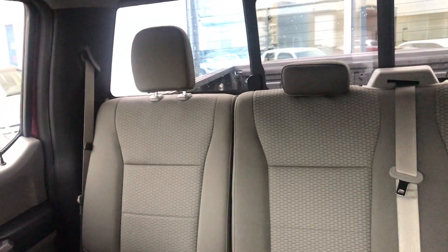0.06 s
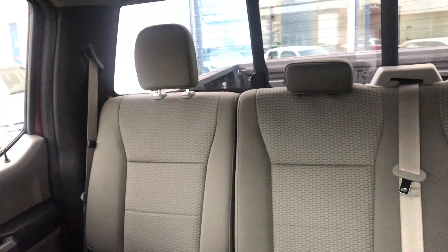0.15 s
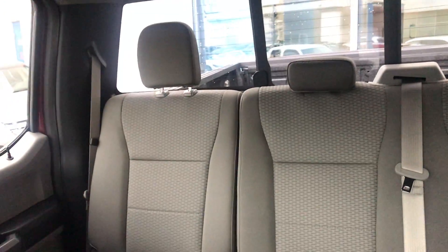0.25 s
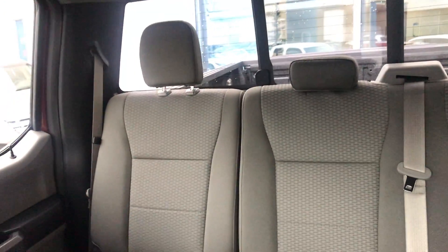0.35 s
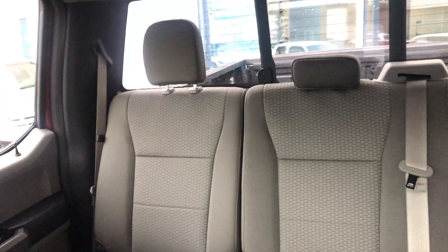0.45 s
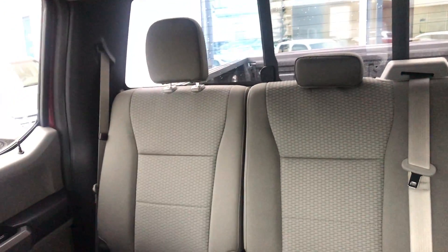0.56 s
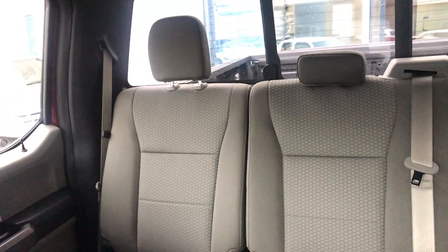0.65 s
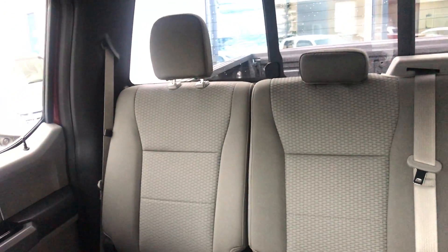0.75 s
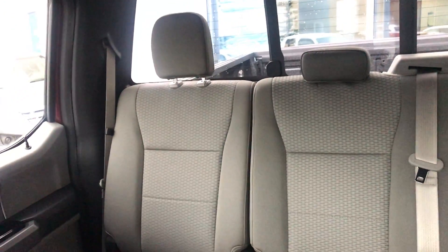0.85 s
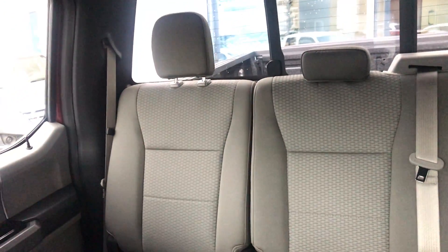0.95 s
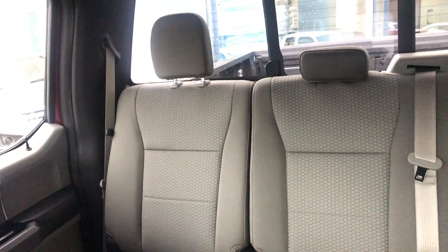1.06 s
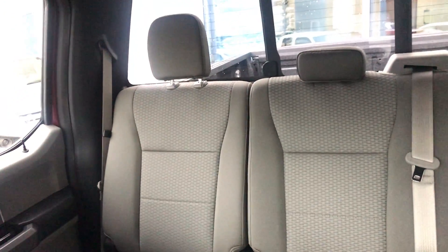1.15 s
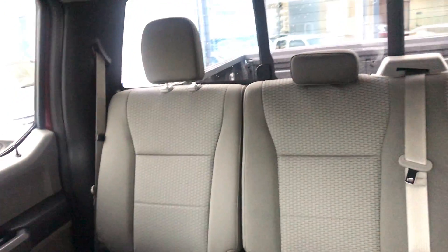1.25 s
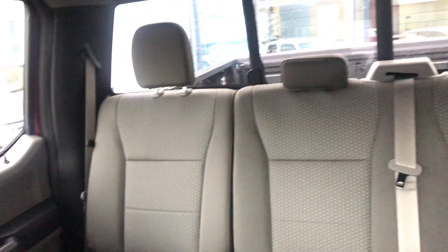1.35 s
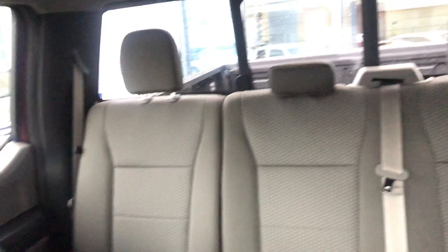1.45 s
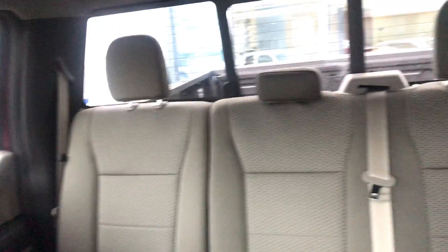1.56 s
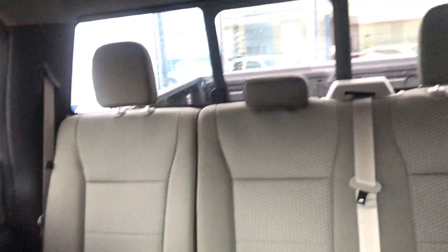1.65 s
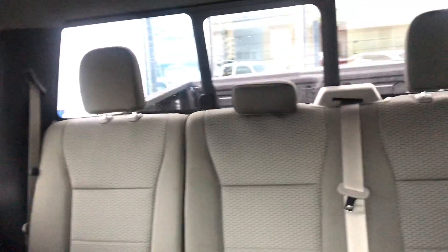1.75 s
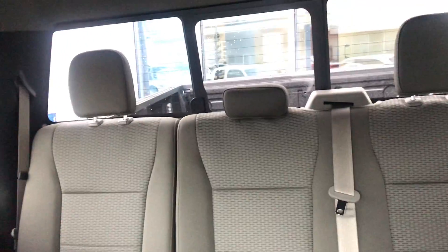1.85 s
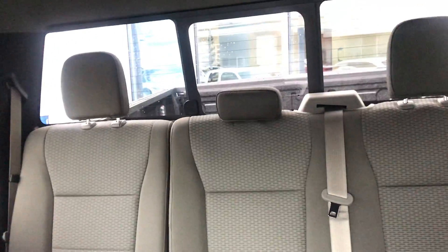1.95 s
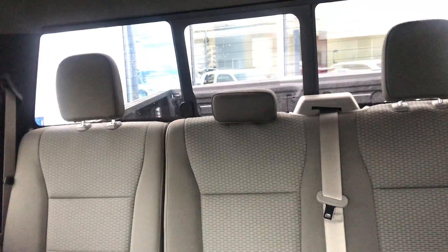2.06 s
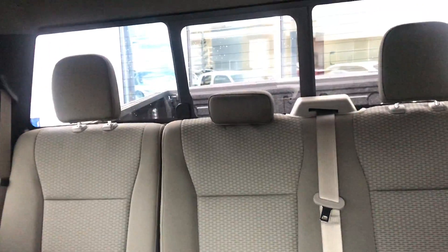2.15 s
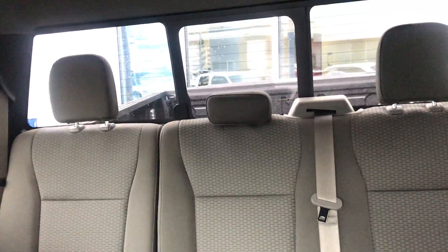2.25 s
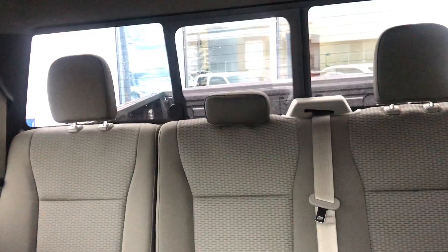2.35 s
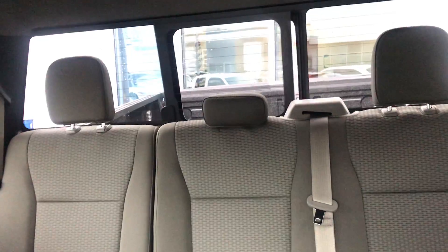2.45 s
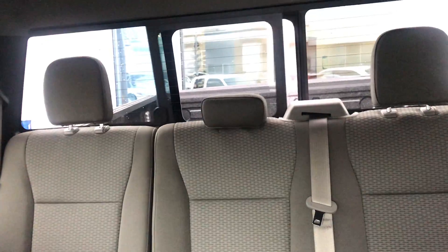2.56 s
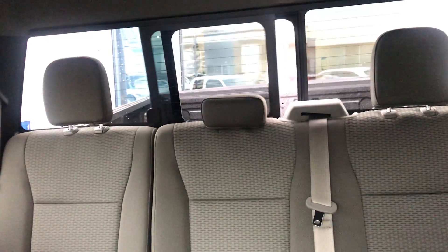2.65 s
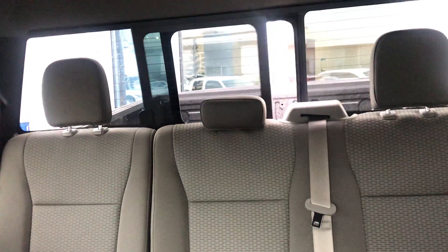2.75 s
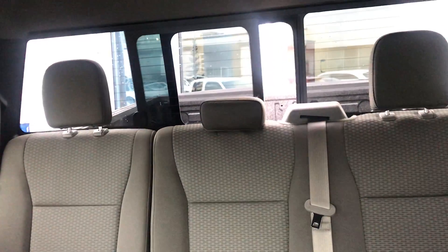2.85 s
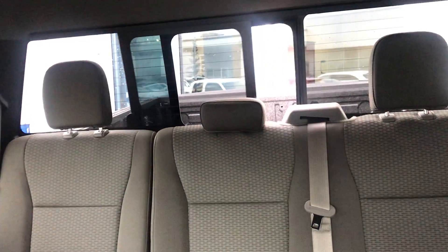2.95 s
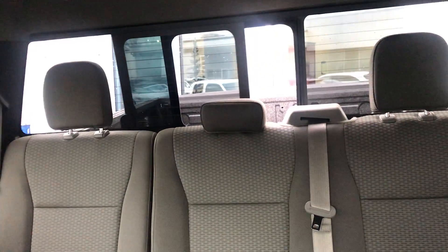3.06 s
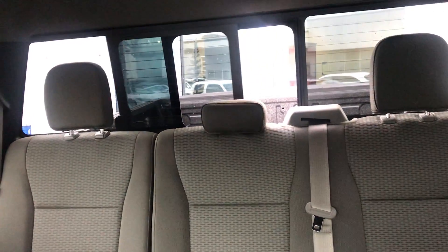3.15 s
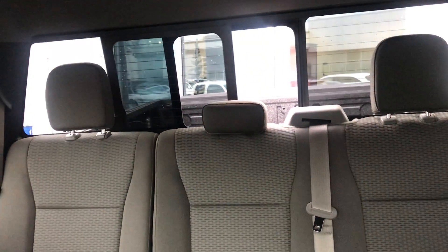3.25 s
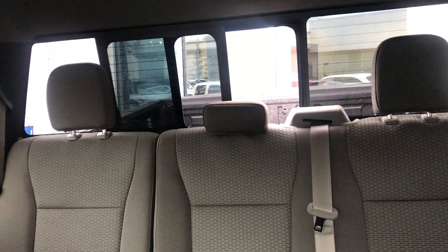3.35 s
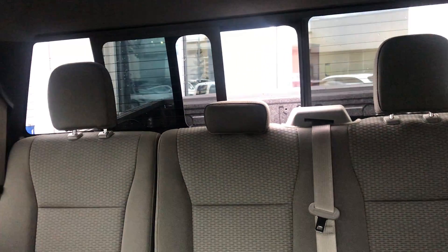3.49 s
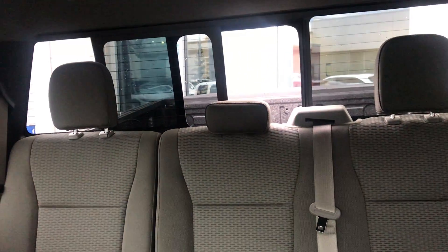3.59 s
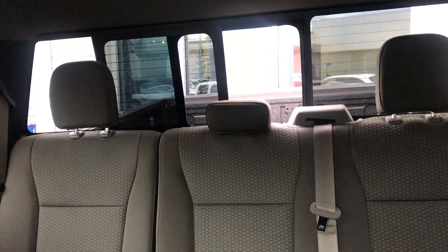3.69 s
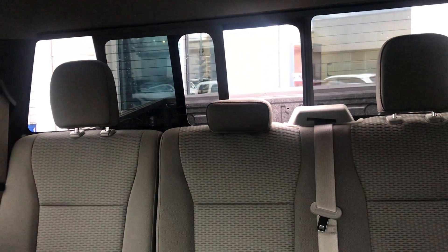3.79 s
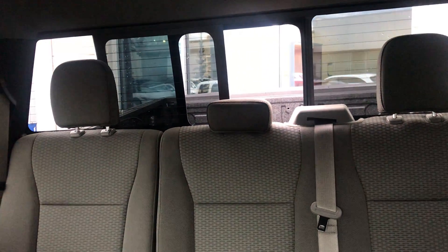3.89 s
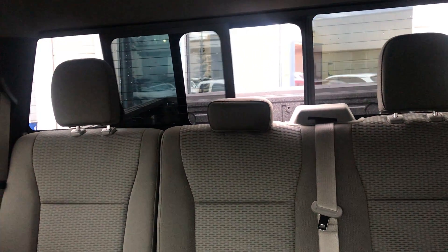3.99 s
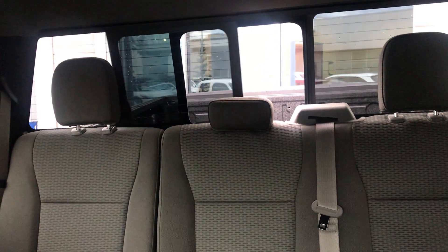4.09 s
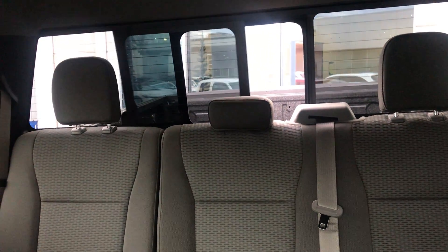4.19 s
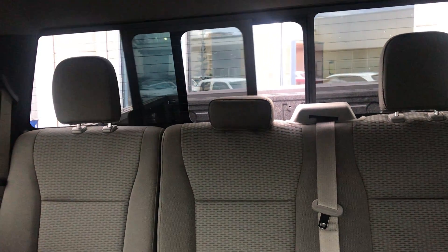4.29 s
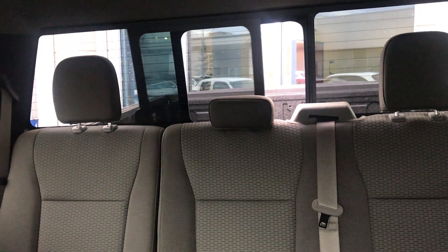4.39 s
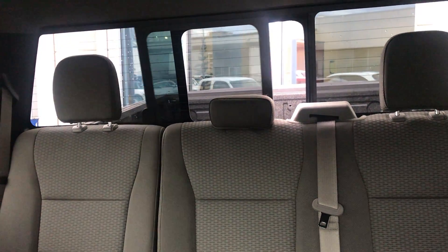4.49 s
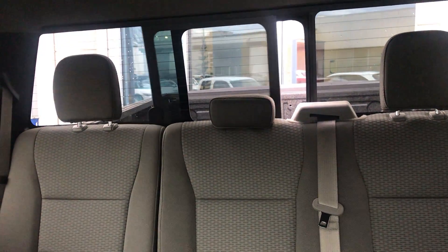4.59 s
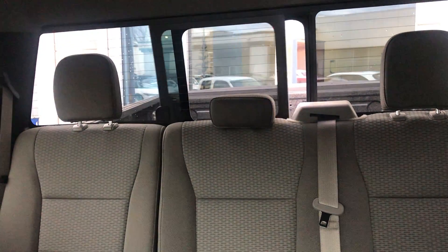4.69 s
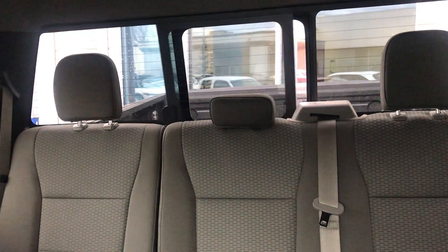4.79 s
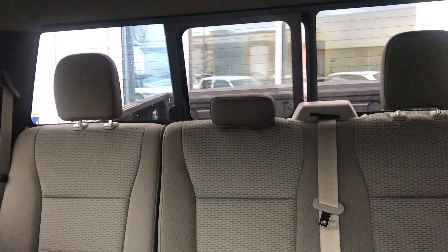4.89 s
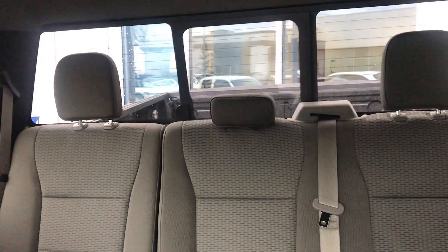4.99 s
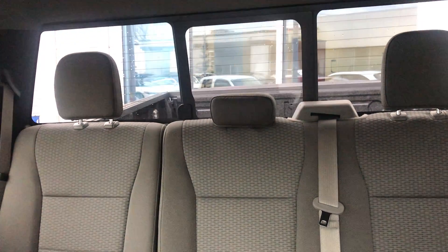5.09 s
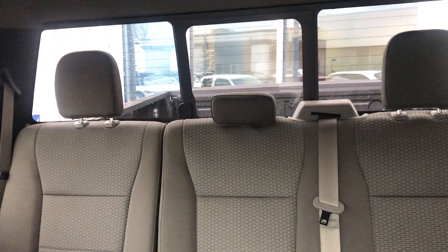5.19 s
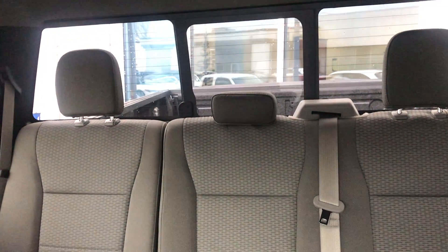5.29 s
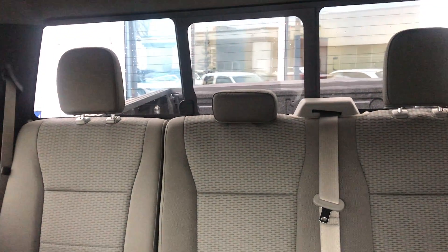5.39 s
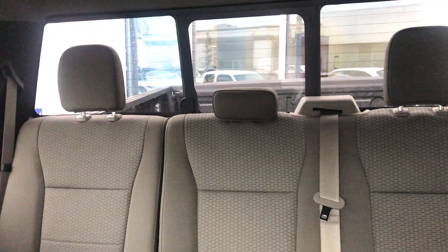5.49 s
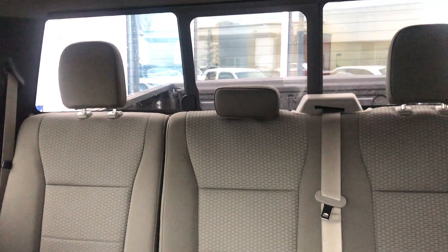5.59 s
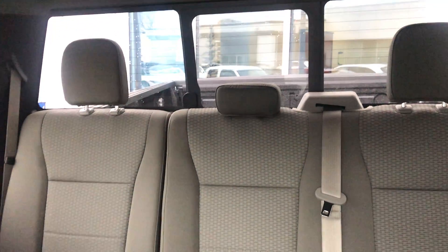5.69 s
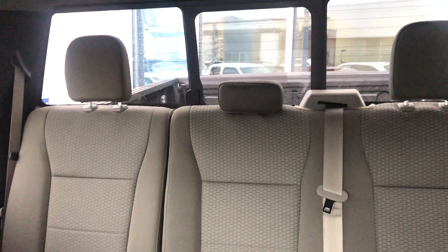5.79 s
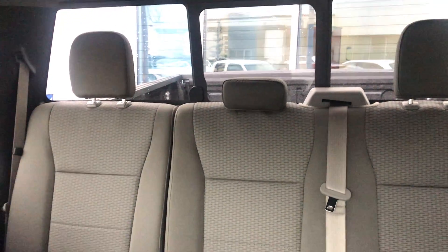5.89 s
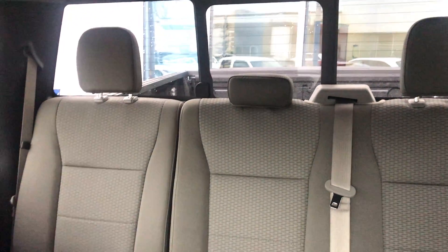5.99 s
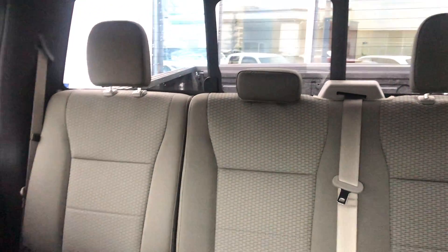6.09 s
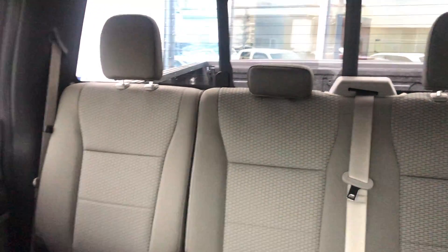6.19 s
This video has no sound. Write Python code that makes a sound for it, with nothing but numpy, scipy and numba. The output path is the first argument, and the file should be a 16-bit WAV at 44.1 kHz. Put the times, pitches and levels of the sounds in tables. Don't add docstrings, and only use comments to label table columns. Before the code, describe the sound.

Inside a closed, padded truck cabin with almost no echo, a phone microphone picks up soft, wavering low rumble and faint hiss. At about 0.3 s a vinyl seat creaks with a short squeaky rasp and soft push of air. Small dry ticks and cloth brushes follow, with a knock near 1.15 s and dull traffic passing around 1.6 s. At 2.35-2.4 s a cluster of sharp clacks and a low thump start the window motor: a wavering deep hum with a dry, gritty felt rub, small rattles and brief glassy chirps, until 3.53 s. A pause lets in slightly more street noise. A soft thump at 3.9 s and a firm knock at 4.0 s begin the closing run, similarly scraping and a little brighter, its hum dipping then rising. At 5.09 s it ends in the loudest crack and boomy thud. Light clicks near 5.5 s, then rumble, faint traffic and cloth rustle.

```python
import sys
import numpy as np
from scipy import signal
from scipy.fft import rfft, irfft, next_fast_len
from scipy.io import wavfile
from scipy.ndimage import uniform_filter1d
from numba import njit

SR = 44100
rng = np.random.default_rng(int(sys.argv[2]) if len(sys.argv) > 2 else 0)


def voltage_ratio(level):
    return 10 ** (np.asarray(level, float) / 20)


def master_out(mix):
    frames = np.transpose(np.atleast_2d(mix))
    ceiling = np.clip(frames, -1, 1)
    pcm = np.round(ceiling * 32767).astype(np.int16)
    wavfile.write(sys.argv[1], SR, pcm)


N = 275184
TIME = np.arange(N) / SR


def level(x):
    return x / np.sqrt(np.mean(x ** 2))


@njit
def svf(x, hz, width):
    y, band_state, low_state = np.empty(len(x)), 0., 0.
    for i in range(len(x)):
        g, k = np.tan(np.pi * hz[i] / SR), width / hz[i]
        v = (band_state + g * (x[i] - low_state)) / (1 + g * (g + k))
        band_state = 2 * v - band_state
        low_state += 2 * g * v
        y[i] = k * v
    return y


def band(x, hz, width):
    return svf(x, np.clip(hz + 0 * x, 10, SR / 2.2), 1. * width)


def steep(x, hz, width):
    return level(band(band(x, hz, width), hz, width))


def split(x, low_hz, high_hz):
    low = signal.sosfiltfilt(signal.butter(2, low_hz, fs=SR, output="sos"), x)
    high = signal.sosfiltfilt(signal.butter(2, high_hz, "high", fs=SR, output="sos"), x)
    return low, x - low - high, high


def colour(x, table):
    hz, db = np.transpose(table)
    size = next_fast_len(len(x))
    bins = np.arange(size // 2 + 1) * SR / size + 1
    gain = voltage_ratio(np.interp(np.log(bins), np.log(hz), db))
    return level(irfft(rfft(x, size) * gain, size)[:len(x)])


def walk(rate):
    hold = int(SR / rate)
    steps = np.repeat(rng.standard_normal(N // 200)[:N // hold + 1], hold)
    return 1.3 * uniform_filter1d(uniform_filter1d(steps, hold), hold)[:N]


def patchy(x, low_hz, step, count, slow_db, quick_db):
    out = 0
    for hz in low_hz * step ** np.arange(count):
        swell_db = np.minimum(slow_db * walk(4.91) + quick_db * walk(30), 3.0)
        out = out + voltage_ratio(swell_db) * band(x, hz, hz * (step - 1))
    return out


def bell(s, length):
    return np.exp(-(2 * (TIME - s) / length) ** 2)


def swells(rows):
    return sum(db * bell(s, length) for s, db, length in rows)


def bumps(rows):
    return sum(voltage_ratio(db) * bell(s, length) for s, db, length in rows)


def curves(rows, rise, fall):
    s, *columns = np.transpose(rows)
    gate = np.clip((TIME - s[0]) / rise + 1, 0, 1) * np.exp(-np.clip(TIME - s[-1], 0, 1) / fall)
    return [np.interp(TIME, s, column) for column in columns], gate


def burst(t60, rise=0.00062):
    age = np.arange(SR // 2) / SR
    return np.minimum(age / rise, 1) * np.exp(-np.log(1000) * age / max(t60, .005))


def struck_tone(hz, t60, rise):
    return burst(t60, rise) * np.sin(2 * np.pi * hz * np.arange(SR // 2) / SR)


def ring(x, modes):
    out = 0
    for hz, db, t60 in modes:
        pole = np.exp((2j * np.pi * hz - np.log(1000) / t60) / SR)
        out = out + voltage_ratio(db) * signal.lfilter([1], [1, -pole], x).imag
    return out


def add(out, s, x):
    at = int(s * SR)
    out[at:at + len(x)] += x[:N - at]


# pitch_hz, density_db (per Hz)
CABIN_AIR = [(12, -51.5), (20, -23), (35, -5.5), (58, 0), (81, -8.5), (204, -11.5), (241, -21.5),
             (277, -16.5), (319, -22), (367, -23), (624, -30.5), (1120, -30), (1610, -37.5), (12100, -50),
             (16000, -50)]
# centre_s, level_db (over the still air), length_s
CLOTH = [(.72, 2.5, .1), (.965, 6, 0.055), (1.13, 4, 0.15), (1.36, 4.5, .06), (1.58, 3, .05),
         (1.81, 5, 0.049), (2.24, -3, 0.025), (5.17, 3.5, .04), (5.96, 5, 0.11), (6.2, 5, 0.4)]
# centre_s, level_db, length_s
TRAFFIC = [
    (.75, -79, 0.26),
    (1.6, -73.5, 0.57),
    (2.0, -81, 0.27),
    (6.05, -78, 0.28),
]
# centre_s, level_db (over the idle rumble), length_s
ROCKS = [(.34, 13, 0.095), (.85, 7, 0.14), (2.1, 4, 0.27), (2.4, 11.5, .12), (2.87, 5, 0.17),
         (3.39, 8, .08), (3.53, 7, .08), (4.02, 11, 0.15), (4.43, 8, 0.15), (4.69, 12, 0.14),
         (5.6, -4.5, 0.89), (6.14, 7, .1)]


def cabin():
    cloth_db = swells(CLOTH)
    gap = np.interp(TIME, (2.4, 3.55, 4.0, 5.05), [0, 1, 1, 0])
    far = rng.standard_normal(N)
    leak = voltage_ratio(-72.5 + 0.92 * walk(5.1)) * gap * steep(far, 2800, 3300)
    leak = leak + bumps(TRAFFIC) * steep(far, 3840, 5300)

    air = voltage_ratio(-49) * colour(rng.standard_normal(N), CABIN_AIR)
    low, street, hiss = split(air, 1230, 4550)
    rumble, middle, upper = split(low, 49.0, 402)

    mode_hz = 54.05 * (1 + 0.0616 * walk(18) + 0.0395 * walk(4.003))
    mode = np.sqrt(2) * np.sin(2 * np.pi * np.cumsum(mode_hz) / SR)
    rumble_db = -55 + 4.5 * np.minimum(walk(13), .4) + swells(ROCKS)
    rumble = voltage_ratio(rumble_db) * (mode + voltage_ratio(-7.0) * level(rumble))
    cross_mode = voltage_ratio(-67 + 1.9 * walk(14)) * steep(middle, 211.7, 40)

    rustle_db = -70.5 + 0.27 * cloth_db + 1.9 * gap + 0.88 * walk(8.0)
    dull = middle * voltage_ratio(1.4 * walk(7)) + level(upper) * voltage_ratio(rustle_db)
    street = level(patchy(street, 765, 1.3, count=9, slow_db=1.0, quick_db=-4.5))
    street = voltage_ratio(-77 + 0.78 * cloth_db) * street
    return leak + rumble + cross_mode + dull + street + voltage_ratio(-77 + cloth_db) * level(hiss)


# pitch_hz, density_db (per Hz)
VINYL = [(120, -35), (200, -5), (728, -2.5), (1050, -3.5), (1190, -3), (1680, -12), (1810, -3), (2800, -15),
         (3610, -14.5), (5700, -20.5), (6240, -17), (7760, -33), (11000, -27.5), (15500, -37)]
# start_s, rasp_db, squeak_db, push_db
CREAK = [
    (0.287, -64, -81, -53),
    (0.293, -51, -74, -26.5),
    (0.321, -48, -49, -35),
    (.332, -56, -62, -33),
    (0.342, -64, -77, -30.5),
]


def seat():
    (rasp_db, squeak_db, push_db), gate = curves(CREAK, .004, 0.0076)
    rasp, grit = rng.standard_normal((2, N)) * voltage_ratio(1.4 * walk(190))
    squeak = steep(grit, 6170, 500) + voltage_ratio(-7) * steep(grit, 1200, 120)
    squeak = squeak + voltage_ratio(-8) * steep(grit, 3600, 300) + voltage_ratio(-10.0) * steep(grit, 2060, 200)
    push = voltage_ratio(push_db - 14) * steep(grit, 70, 36)
    return gate * (voltage_ratio(rasp_db + 2.5) * colour(rasp, VINYL) + voltage_ratio(squeak_db - 7.5) * squeak + push)


# start_s, level_db,
# pitch_hz, low_knock_db, t60_s
TICKS = [(0.422, -61, 1140, -69, 0.058), (0.837, -65, 3050, -67, 0.031), (1.147, -58, 800, -51, 0.066),
         (1.146, -66, 2400, -68, 0.06), (1.158, -69, 2200, -64, .03), (1.806, -66, 2600, -61, 0.08),
         (2.06, -66, 800, -64, 0.097), (1.981, -78, 900, -57, 0.065), (2.189, -89, 700, -61, 0.073),
         (2.338, -64.5, 2800, -55.5, 0.13), (3.952, -59, 3170, -54, 0.054), (5.13, -50, 1750, -50, 0.05),
         (5.132, -69, 5000, -70, .03), (2.43, -52, 9900, -70, .03), (2.619, -63, 11200, -72, 0.03),
         (2.897, -56, 13100, -70, .03), (3.145, -56, 13000, -72, .025), (2.983, -55, 880, -42.5, 0.043),
         (3.518, -69, 700, -48, .04), (4.07, -62, 890, -41.5, 0.038), (4.097, -58, 830, -43.5, 0.041),
         (5.491, -75, 600, -54, 0.075), (5.573, -55, 1900, -68, 0.014), (.274, -69, 14000, -80, .015),
         (.575, -69, 11500, -80, 0.016), (.6, -69, 14500, -80, .015), (1.955, -66, 850, -64, .15),
         (2.0, -70, 1400, -70, .08), (2.075, -71, 1600, -70, .08), (2.24, -70, 14500, -80, .02),
         (5.188, -69, 14200, -80, .015), (5.515, -71, 13800, -80, .015), (5.044, -51, 9000, -70, 0.039),
         (0, -62, 3000, -55, .006), (2.5045, -51, 2300, -70, .02), (2.535, -50, 3900, -70, .02),
         (2.5555, -53, 2200, -70, .02), (2.677, -54, 3300, -70, .025), (4.6289, -50, 2600, -70, .025),
         (3.0618, -53, 2400, -70, .025)]
# start_s,
# pitch_hz, level_db, t60_s
RINGS = [(.291, 2060, -53, .12), (.31, 1200, -43, .12), (.312, 6250, -55, .1), (.303, 760, -48, .08),
         (.33, 1250, -51, .05), (5.51, 330, -50, .04), (.421, 1380, -54, .03), (.4245, 1150, -50, .04),
         (1.146, 470, -41, .05), (1.148, 960, -50, .03), (1.159, 418, -48, .04), (2.19, 480, -51, .05),
         (2.349, 1250, -54, .03), (2.386, 1620, -36, 0.034), (3.526, 1560, -58, .04),
         (3.911, 1250, -53, .03), (4.071, 900, -48, .03), (4.097, 890, -48, .03), (2.983, 900, -48, .03),
         (5.131, 1950, -51, .035), (5.108, 520, -40, .1), (5.492, 478, -48, .04), (5.573, 1100, -53, .015)]


def ticks():
    out = np.zeros(N)
    grits = rng.standard_normal((len(TICKS), SR // 2))
    for (s, db, hz, low_db, t60), grit in zip(TICKS, grits):
        click = voltage_ratio(db + 2.5) * steep(grit, hz, min(.95 * hz, 5000))
        body = voltage_ratio(low_db + 4.5) * steep(grit, 337, 400)
        add(out, s, burst(t60, rise=0.036 * t60) * (click + body))
    for s, hz, db, t60 in RINGS:
        add(out, s, voltage_ratio(db) * struck_tone(hz, t60, rise=.09 * t60))
    return out


# start_s, crack_db, crack_hz, panel_db, thump_db
KNOCKS = [(2.353, -54, 1280, -51.5, -41), (2.3782, -36, 4300, -46, -51), (2.385, -28.5, 1620, -38, -37.5),
          (2.3929, -49, 1440, -40, -31.5), (2.4292, -41, 3210, -51, -48), (2.4547, -40, 3460, -63, -55),
          (2.504, -40, 3850, -65, -58), (2.538, -41, 2800, -49, -49), (2.622, -43, 4230, -49, -46.5),
          (3.5306, -62, 1557, -58, -41), (3.9113, -62, 1250, -49, -36), (3.9853, -33, 2100, -42, -33),
          (3.9973, -42, 1530, -41.5, -26), (5.0426, -47, 3680, -54, -39), (5.0899, -20, 1590, -38, -29),
          (5.0954, -32, 1520, -29, -34)]
# pitch_hz, level_db, t60_s
PANELS = [(336, -6, 0.12), (420, 12, 0.015), (545, 1.5, 0.043), (700, -4, 0.059), (904, -6, 0.04),
          (1410, 4.5, 0.019), (1620, 4, 0.022)]
# pitch_hz, level_db, t60_s
WALL = [(116, 0.5, 0.15), (182.4, 1.5, 0.14), (216.9, -14.5, 0.66), (274, -19, 0.16)]
# start_s, pitch_hz, level_db, t60_s
LOADS = [(0.35, 324, -47.5, 0.19), (.37, 185, -37.5, 0.088), (0.388, 180, -37, 0.051),
         (1.16, 149, -40, 0.088), (2.36, 110.6, -32.5, 0.16), (2.407, 97, -24.5, 0.17),
         (3.914, 183, -28, 0.13), (4.013, 159, -29, 0.12), (3.7, 77, -47, 0.16), (4.07, 119.5, -34, 0.22),
         (2.991, 176, -37.5, 0.15), (5.093, 241, -29.5, 0.12), (5.089, 568.5, -32.5, 0.071),
         (.296, 81, -40, .2), (5.499, 150, -36, 0.061), (5.103, 106.4, -22, 0.19),
         (5.159, 142, -24.5, 0.07)]


def knocks():
    crack_t60_s = 0.041
    crack, panel, boom = np.zeros((3, N))
    grit = rng.standard_normal((len(KNOCKS), 2, SR // 2))
    for (s, crack_db, hz, panel_db, thump_db), (snap, rap) in zip(KNOCKS, grit):
        snap = steep(snap, hz, 2400) + voltage_ratio(-12.5) * steep(snap, 4800, 8300)
        add(crack, s, voltage_ratio(crack_db - 8.5) * burst(crack_t60_s) * snap)
        add(panel, s, voltage_ratio(panel_db - 24.5) * burst(0.52 * crack_t60_s) * rap)
        boom[int((s + .004) * SR)] = voltage_ratio(thump_db - 3.0)
    push = np.hanning(int(0.002 * SR))
    boom = ring(np.convolve(boom, push / push.sum())[:N], WALL)
    for s, hz, db, t60 in LOADS:
        add(boom, s, voltage_ratio(db) * struck_tone(hz, t60, rise=0.0095))
    return crack + ring(panel, PANELS) + boom


def grit_ticks(rate, spread_db):
    chance = rng.random((2, N))
    size = (chance[0] < rate / SR) * voltage_ratio(-spread_db * np.log(chance[1] + 1e-9))
    return signal.lfilter([1], [1, -np.exp(-1 / (0.00037 * SR))], size)


# centre_s, pitch_hz, level_db, length_s
PANE = [(2.432, 3150, -58, .03), (2.442, 4000, -56, .035), (2.445, 5350, -62, .04), (2.445, 2580, -60, .03),
        (2.506, 3960, -58, .02), (2.558, 1720, -60, .045), (2.68, 3100, -63, .03), (2.75, 5200, -72, .4),
        (2.79, 3200, -64, .04), (2.885, 2330, -57, .035), (2.92, 2330, -55, .04), (2.905, 3450, -58, .04),
        (2.909, 3960, -62, .035), (2.913, 1460, -60, .03), (2.925, 5250, -68, .04), (2.97, 6030, -67, .05),
        (2.95, 1600, -62, .04), (3.0, 1640, -58, .05), (2.981, 2330, -58, .045), (2.995, 5170, -67, .06),
        (3.021, 3960, -63, .035), (3.065, 3010, -60, .03), (3.069, 1890, -57, .028), (3.11, 3150, -66, .07),
        (3.145, 4200, -63, .05), (3.24, 5170, -66, .09), (3.358, 2670, -60, .07), (3.45, 5170, -66, .1),
        (3.46, 2950, -64, .08), (4.05, 3250, -62, .04), (4.25, 1330, -61, .1), (4.24, 3250, -63, .05),
        (4.32, 4000, -64, .07), (4.3, 5200, -70, .15), (4.43, 3190, -60, .09), (4.492, 2840, -59, .028),
        (4.506, 4260, -59, .075), (4.562, 3150, -60, .075), (4.635, 2300, -55, .03),
        (4.655, 3270, -59, .08), (4.7, 2300, -63, .08), (4.68, 4000, -62, .03), (4.8, 4050, -62, .09),
        (4.85, 2600, -62, .08), (4.855, 5300, -65, .08), (4.964, 1580, -56, .065), (4.979, 4310, -60, .03),
        (5.048, 3620, -51, .022), (5.055, 2850, -56, .04), (5.058, 1550, -58, .04)]


def flares(slips):
    out = np.zeros(N)
    for s, hz, db, length in PANE:
        at, span = int((s - length) * SR), int(2 * length * SR)
        tone = steep(slips[at:at + span], hz, 270 + 4 / length)
        size = uniform_filter1d(np.abs(tone), int(.014 * SR))
        tone = level(tone / np.sqrt(size + .05))
        swell = np.exp(-(2 * (TIME[at:at + span] - s) / length) ** 2)
        add(out, s - length, voltage_ratio(db - 4.5) * swell * tone)
    return out


# time_s, rub_db
RUB = [
    [(2.39, -54), (2.404, -55), (2.442, -50), (2.478, -55.5), (2.856, -55.5), (2.904, -51.5), (3.19, -56),
     (3.516, -55.5), (3.53, -61)],
    [(3.995, -47), (4.027, -55), (4.385, -55), (4.401, -52.5), (4.871, -53.5), (5.033, -51.5),
     (5.045, -49.5), (5.081, -52), (5.086, -47.5)],
]
# pitch_hz, density_db (per Hz)
TRACK = [(530, -50), (900, 9.5), (1070, -2), (1420, -2.5), (2070, -4.5), (2300, -4), (3230, -4), (4100, -5),
         (4800, -8.5), (5280, -8.5), (5610, -9), (10500, -15), (12600, -14), (15100, -18), (16000, -25)]
# pitch_hz, density_db (per Hz)
FRAME = [(150, -18), (250, 1), (291, 3), (356, -2.5), (402, -3.5), (706, -5.5), (770, -9.5), (1400, -21.5),
         (1820, -62), (3080, -120)]
# centre_s, level_db, length_s
LIP = [(2.44, 0.5, .04), (2.66, -1.5, 0.39), (2.92, 1, 0.07), (3.0, -0.5, 0.066), (3.45, 3, .15),
       (4.0, -8, 0.023), (4.2, 2, 0.19), (4.39, 4, 0.23), (4.85, 0, .3), (5.047, 6.5, 0.022)]


def slide():
    slips = rng.standard_normal(N) * (voltage_ratio(.8 * walk(30)) + .5 * grit_ticks(250, 1.8))
    _, rub, edge = split(colour(slips, TRACK), 1100, 6500)
    rub = level(rub + patchy(rub, 1100, 1.1, count=19, slow_db=.6, quick_db=3.4))
    rattle = level(patchy(colour(slips, FRAME), 196, 1.25, count=9, slow_db=3.5, quick_db=-0.5))
    out = flares(slips)
    for rows in RUB:
        (rub_db,), gate = curves(rows, .004, .01)
        bright = voltage_ratio(-9 + swells(LIP) + 0.63 * walk(14)) * level(edge)
        shaken = voltage_ratio(-4.5 + 0.89 * walk(15)) * rattle
        out = out + gate * voltage_ratio(rub_db) * (voltage_ratio(-0.74) * rub + bright + shaken)
    return out


# time_s, shaft_hz
SHAFT = [
    [(2.44, 96.13), (2.6, 93.3), (2.82, 97.4), (3.05, 98.7), (3.25, 101.9), (3.55, 99.7)],
    [(4.05, 95.1), (4.15, 85.95), (4.3, 86.6), (4.42, 101.4), (4.65, 99.1), (4.76, 106.5), (5.09, 106.5)],
]
# centre_s, level_db, length_s
HUM = [(2.434, -43, 0.073), (2.6, -56, 0.2), (2.814, -39.5, 0.29), (2.996, -54.5, 0.13),
       (3.222, -42.5, 0.12), (3.442, -46, 0.19), (4.068, -43.5, 0.11), (4.258, -44.5, 0.14),
       (4.513, -47, 0.24), (4.768, -46, 0.18), (5, -41, 0.32)]
# centre_s, level_db, length_s
SECOND = [(2.66, -55, 0.043), (2.85, -60, 0.13), (3.27, -52, 0.13), (3.4, -56, 0.046), (3.53, -57, 0.065),
          (4.1, -51, 0.057), (4.21, -48.5, 0.081), (4.4, -49.5, 0.15), (4.64, -51.5, 0.071),
          (4.77, -61, .12), (4.95, -61, 0.096)]
# centre_s, level_db, length_s
THIRD = [(2.44, -53, 0.051), (2.72, -57.5, 0.16), (2.88, -65, 0.042), (3.47, -63, 0.044),
         (4.1, -49.5, 0.042), (4.55, -65, 0.14), (4.75, -70, 0.071), (5.0, -66.5, 0.083)]
ORDERS_IDLE_DB = (-61, -65, -72)


def motor():
    waver = 1 + 0.01185 * walk(24.99)
    sizes = []
    for idle_db, rows in zip(ORDERS_IDLE_DB, (HUM, SECOND, THIRD)):
        sizes.append((voltage_ratio(idle_db) + bumps(rows)) * voltage_ratio(1.67 * walk(20)))
    out = 0
    for rows in SHAFT:
        (hz,), gate = curves(rows, 0.048, 0.0046)
        turn = 2 * np.pi * np.cumsum(hz * waver) / SR
        for order, size in enumerate(sizes, 1):
            out = out + gate * np.sqrt(2) * size * np.sin(order * turn)
    return out


def scene():
    near = motor() + slide() + knocks() + ticks() + seat()
    age = np.arange(int(.15 * SR)) / SR
    tail = band(rng.standard_normal(len(age)), 1500, 4000) * np.exp(-np.log(1000) * age / .08)
    wet = signal.fftconvolve(near, tail / np.sqrt(np.sum(tail ** 2)))[:N]
    return (near + voltage_ratio(-18.5) * wet + cabin())[None]


def band_limit(x):
    return signal.sosfilt(signal.butter(12, 15800, fs=SR, output="sos"), x)


# pitch_hz, width_hz, depth (0-1)
MIC_DIP = (10440, 560, 0.56)


def record(dry):
    hz, width, depth = MIC_DIP
    x = dry - depth * band(dry[0], hz, width)
    x = signal.sosfilt(signal.butter(2, 44.6, "high", fs=SR, output="sos"), x)
    limit = .12
    x = limit * np.tanh(x / limit)
    x = signal.sosfilt(signal.ellip(10, .2, 60, 15790, fs=SR, output="sos"), x)
    return band_limit(x)


dry = scene()
out = record(dry)
master_out(out)
```